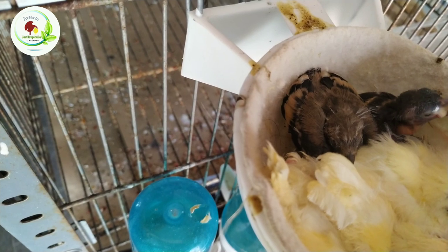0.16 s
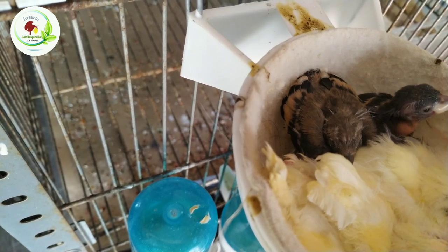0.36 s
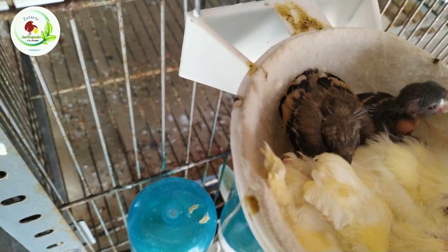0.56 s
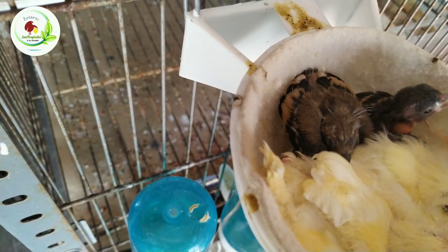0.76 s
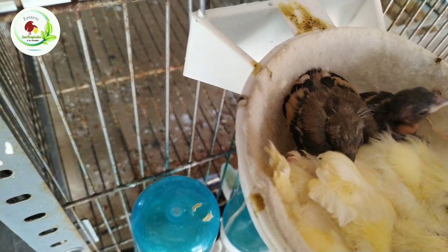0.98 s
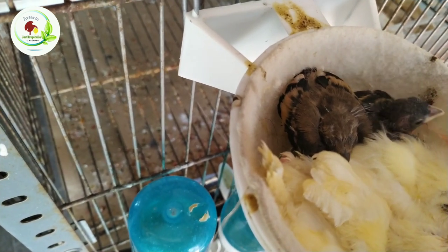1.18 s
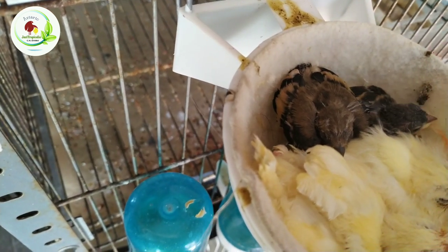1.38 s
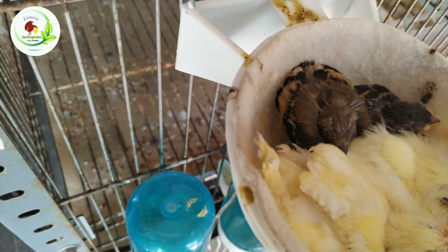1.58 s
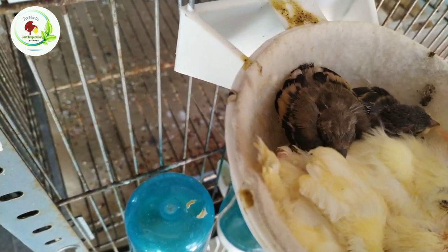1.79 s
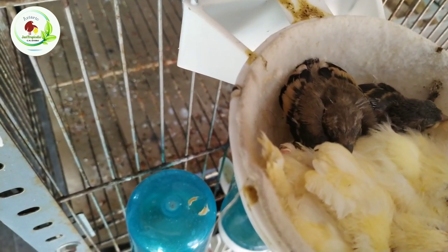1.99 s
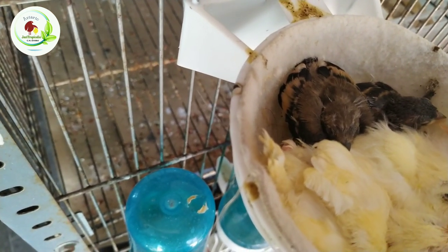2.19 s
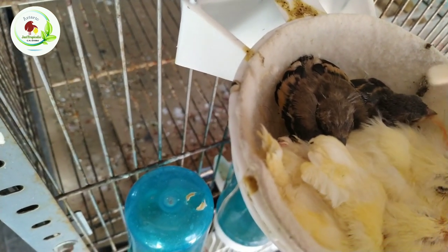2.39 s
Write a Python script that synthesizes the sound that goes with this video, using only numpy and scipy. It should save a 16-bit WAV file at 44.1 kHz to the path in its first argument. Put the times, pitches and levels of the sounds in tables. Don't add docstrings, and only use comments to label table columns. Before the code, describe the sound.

Bird whistles sweep sharply up and down in two bursts, then soft nestling hisses and beak ticks

```python
import sys
import numpy as np
from scipy import signal
from scipy.fft import rfft, irfft
from scipy.io import wavfile
from scipy.ndimage import uniform_filter1d

SR = 44100
rng = np.random.default_rng(int(sys.argv[2]) if len(sys.argv) > 2 else 0)


def generate_wav(signal):
    frames = np.transpose(np.atleast_2d(signal))
    scaled = np.clip(frames, -1, 1) * 32767
    pcm = np.round(scaled).astype(np.int16)
    wavfile.write(sys.argv[1], SR, pcm)


def natural_amplitude(level_db):
    exponent = np.asarray(level_db, float) / 20
    return 10 ** exponent


N = 108045


def evened(x):
    return x / np.sqrt(np.mean(x ** 2) + 1e-20)


def read(points, hz):
    f, value = np.transpose(points)
    return np.interp(np.log(hz + 1), np.log(f + 1), value)


def add(mix, start_s, sound):
    part = mix[..., round(max(start_s, 0) * SR):][..., :sound.shape[-1]]
    part += sound[..., :part.shape[-1]]


def edged(t, edge_s):
    return np.clip(np.minimum(t - t[0], t[-1] - t) / edge_s, 0, 1)


def coloured(count, gain):
    spectrum = rfft(rng.standard_normal(count))
    return evened(irfft(spectrum * gain(np.fft.rfftfreq(count, 1 / SR)), count))


def resonance(centre_hz, half_width_hz):
    return coloured(8192, lambda f: 1 / (1 + ((f - centre_hz) / half_width_hz) ** 2))


# f/Hz, level/dB
AIR_SPECTRUM = [(20, -1.5), (46, -1.5), (75, -13), (350, -17), (900, -25), (4000, -25), (9000, -14.5),
                (10500, -26.5), (15000, -44)]
# f/Hz, likeness/-1 to 1
AIR_LIKENESS = [(60, 0.98), (380, 0.88), (2380, -0.42), (15000, -0.061)]
AIR_DB = -33.5
HUM_HZ, HUM_DB = 127.6, -51.5


def air():
    hz = np.fft.rfftfreq(N, 1 / SR)
    left, other = rfft(rng.standard_normal((2, N)))
    same = np.clip(read(AIR_LIKENESS, hz), -1, 1)
    right = same * left + np.sqrt(1 - same ** 2) * other
    hiss = evened(irfft(np.array([left, right]) * natural_amplitude(read(AIR_SPECTRUM, hz)), N))
    hum = natural_amplitude(HUM_DB) * np.sin(2 * np.pi * HUM_HZ * np.arange(N) / SR)
    return hum + natural_amplitude(AIR_DB) * hiss


# f/Hz, t60/s
ROOM_DECAY = [(1000, 0.49), (3000, 0.6), (7000, .42), (14000, 0.45)]
EARLY_DB, EARLY_T60_S = -2.5, 0.11


def room(x):
    taps = np.zeros((2, SR // 2))
    at = np.arange(60, SR // 2 - 10, 10) + rng.integers(0, 10, (2, (SR // 2 - 61) // 10))
    np.put_along_axis(taps, at, rng.choice([-1., 1.], at.shape), 1)
    hz, t, z = signal.stft(taps, SR, nperseg=256)
    late = natural_amplitude(-60 * t / read(ROOM_DECAY, hz)[:, None])
    early = natural_amplitude(EARLY_DB - 60 * t / EARLY_T60_S)
    tail = signal.istft(z * (late + early), SR, nperseg=256)[1]
    return signal.fftconvolve(x, tail / np.linalg.norm(tail[0]), axes=1)[:, :N]


# start t/s, length t/s, level/dB
RUSTLES = [
    (1.444, 0.13, -44.5),
    (2.111, 0.14, -46.5),
]


def rustle(start, length, db):
    t = np.arange(0, length, 1 / SR)
    hiss = resonance(1500, 700)
    return start, hiss[:len(t)] * natural_amplitude(db) * edged(t, 0.0024)


# start t/s, f/Hz, t60/s, level/dB
BEAK_TICKS = [
    (1.294, 1800, 0.0048, -11),
    (2.274, 6000, 0.0052, -8.5),
    (2.8, 7400, .003, -13),
    (2.274, 9000, .003, -20),
    (2.274, 3600, .004, -25),
    (1.862, 2150, 0.0067, -21),
]


def tick(start, hz, t60, db):
    t = np.arange(600) / SR
    rise = np.minimum(t * hz / 3, 1)
    return start, natural_amplitude(db - 60 * t / t60) * rise * np.sin(2 * np.pi * hz * t)


RASP_STARTS = [.049, .56, .741, .88, .952, 1.428, 1.494, 1.665, 1.857, 2.021, 2.111, 2.15, 2.227, 2.366]
# length t/s, level/dB, wide hiss level/dB
RASPS = [(0.043, -30.5, -2), (0.12, -26, 2.5), (0.082, -19, 1.5), (0.17, -28.5, 1.5), (0.011, -19, -5.5),
         (0.082, -31, -3.5), (0.032, -24.5, -3.5), (0.037, -26.5, -8), (0.081, -35.5, -3),
         (0.013, -24, -6.5), (0.0173, -25.5, -2.5), (0.036, -26.5, -2.5), (0.037, -27.5, -5),
         (0.0095, -25, -3)]
RASP_TOP_DB = [-4.5, -30, -32, -6, -18, -8, -7, -3, -4.5, -6, -11, -5, -5, -4]
# f/Hz, level/dB
BREATH_SPECTRUM = [(600, -57), (1500, -59), (1850, -6), (2150, -0.5), (6500, 3.5), (10000, 1.5),
                   (12500, -9), (15500, -24)]
GAPE_HZ, GAPE_WIDTH_HZ = 8480, 2000
TOP_HZ, TOP_WIDTH_HZ = 11850, 7500
GRIT, SAG_DB = 0.11, -1
PUFF_DB, PUFF_S = 3, 0.0059


def rasp(start, length, db, wide_db, top_db):
    gape = resonance(GAPE_HZ, GAPE_WIDTH_HZ / 2)
    top = resonance(TOP_HZ, TOP_WIDTH_HZ / 2)
    wide = coloured(8192, lambda f: natural_amplitude(read(BREATH_SPECTRUM, f)))
    grit = 1 + GRIT * evened(uniform_filter1d(rng.standard_normal(8192), size=80))
    hiss = (gape + natural_amplitude(wide_db) * wide + natural_amplitude(top_db) * top) * grit
    t = np.arange(0, length, 1 / SR)
    level = natural_amplitude(db + SAG_DB * t / length + PUFF_DB * np.exp(-t / PUFF_S))
    return start, hiss[:len(t)] * level * edged(t, 0.00053)


# start t/s, length t/s, from f/Hz, to f/Hz
CHEEPS = [(0, .01, 7200, 7050), (0, .01, 5850, 5900), (.076, .03, 7350, 7450), (1.888, .03, 3900, 4250),
          (2.028, .03, 7800, 7650), (2.022, .035, 4950, 5450), (2.153, .035, 6900, 6750),
          (2.153, .03, 4800, 4780), (2.214, .012, 8200, 8000), (2.32, .03, 5200, 5600),
          (2.345, .05, 1830, 1920), (0, .09, 11720, 11750), (1.858, .03, 5300, 5650),
          (1.675, .09, 1040, 1050), (2.35, .05, 1050, 1040), (2.35, .06, 340, 330), (0, .04, 13000, 13050),
          (.14, .04, 10800, 10850), (1.862, .03, 4400, 3800), (1.33, .04, 11300, 11500)]
CHEEP_DB = [-33, -40.5, -31.5, -40, -31.5, -34.5, -29, -39.5, -38.5, -49.5, -52, -55, -36.5, -59.5, -59.5,
            -54, -49, -47.5, -46.5, -47.5]
CHEEP_OCTAVE_DB, CHEEP_ROUGH = -36, 0.54


def cheep(start, length, from_hz, to_hz, db):
    curve = []
    for when, glide, swell_db in [(0, 0.05, 3.5), (.25, 0.568, 14), (1, 1, 2.5)]:
        hz = from_hz + glide * (to_hz - from_hz)
        curve.append((start + when * length, hz, db + swell_db, CHEEP_OCTAVE_DB))
    return whistle((-60, -60, CHEEP_ROUGH, 0), curve)


# t/s, f/Hz, level/dB, octave level/dB over the fundamental
LONG_CALLS = [
    ((-12, -23, .3, 2), [(.15, 1980, -35.5, 1.5), (.187, 2476, -23, -15), (.196, 2576, -22, 3), (.202, 2637, -30.5, 13.5), (.212, 2790, -22, 16), (.24, 3010, -38, -20), (.262, 3242, -29, 20), (.275, 3410, -24, 18), (.29, 3450, -17, 0)]),
    ((-20, -20, .5, -0.5), [(.206, 6354, -14, -43), (.216, 5800, -26.5, 1), (.23, 4685, -16, 0.5), (.26, 3630, -16.5, -13), (.30, 2732, -20.5, -26), (.35, 2241, -27.5, 2), (.42, 1842, -36, -4), (.47, 1697, -41.5, 4)]),
    ((-30, -40, 0.37, 2), [(.288, 4534, -25, 11), (.30, 4840, -9, -13), (.345, 4967, -13, -6.5), (.362, 5296, -11.5, -6.5), (.38, 5515, -3, -18), (.41, 5770, -17, -5.5)]),
    ((-50, -60, 0.56, -0.7), [(.422, 8190, -22, -35), (.428, 6930, 3.5, -48), (.44, 7330, -18.5, -44), (.462, 7524, -4, -44)]),
              ((-14, -25, .6, 0), [(.578, 2010, -31, 3), (.592, 2099, -29, 11), (.601, 2438, -25.5, 8.5), (.64, 2456, -30.5, 5.5), (.66, 2480, -43, 22)]),
    ((-39, -56, .6, -2), [(.735, 7700, -10, -28), (.75, 7550, -14.5, -46), (.765, 6600, -17.5, -38), (.81, 5450, -19.5, -21), (.835, 5170, -27, -27)]),
    ((-24, -20, .4, -2), [(.745, 2115, -52, -8), (.86, 2081, -31, -3), (.95, 2057, -29.5, -32), (1.0, 2155, -22, -6.5)]),
              ((-20, -30, .7, 1.5), [(.86, 2350, -26.5, 0.5), (.90, 2515, -23.5, -20), (.94, 2330, -33, -33), (.97, 2450, -24, -30), (.995, 2506, -35, -20)]),
    ((-14.5, -13.5, .2, 1.5), [(.99, 2480, -24, -1), (1.0, 2547, -20.5, -4.5), (1.025, 2700, -30, -3), (1.045, 3263, -19, -18), (1.095, 4334, -20.5, 2), (1.112, 5080, -15, -9.5), (1.13, 5290, -5.5, -9.5), (1.15, 5730, -6.5, -46)]),
    ((-14, -27, .12, 0), [(1.033, 3104, -40, -1), (1.05, 3401, -29.5, 24), (1.08, 3568, -22, -13), (1.11, 3607, -25.5, 21.5), (1.16, 3535, -32.5, -1)]),
    ((-48, -68, 0.63, -2), [(1.2, 7870, -12, -39), (1.206, 6805, 1, -32), (1.213, 6900, -11.5, -11.5), (1.232, 7850, -16.5, -61)]),
    ((0, 0, 1.1, -0.2), [(1.859, 1690, -38.5, 7.5), (1.872, 1844, -55.5, 24), (1.915, 1873, -65, 26.5)]),
]
WOBBLE, WOBBLE_TOP_HZ = .035, 5000
EDGE_S = 0.0009


def whistle(voice, curve):
    third_db, fourth_db, rough, pan_db = voice
    s, hz, db, octave_db = np.transpose(curve)
    t = np.arange(s[0], max(s[-1], s[0] + .004), 1 / SR)
    drift = signal.oaconvolve(rng.standard_normal((N // 4, 2)), np.hanning(110)[:, None], "same")
    wobble, flutter = drift[:len(t)].T / 6.4
    pitch = uniform_filter1d(np.interp(t, s, hz), size=200, mode="nearest")
    pitch = pitch + np.minimum(pitch, WOBBLE_TOP_HZ) * WOBBLE * rough * wobble
    phase = 2 * np.pi * np.cumsum(pitch) / SR
    octave = np.interp(t, s, octave_db)
    tone = np.zeros(len(t))
    for k, partial_db in enumerate([0, octave, octave + third_db, octave + fourth_db], start=1):
        audible = pitch * k < 17000
        tone += natural_amplitude(partial_db) * audible * np.sin(k * phase)
    level = np.sqrt(2) * natural_amplitude(np.interp(t, s, db)) * (1 + rough * flutter)
    pan = natural_amplitude(np.array([[.5], [-.5]]) * pan_db)
    return s[0], tone * level * edged(t, EDGE_S) * pan


DIRECT_DB, TICK_ROOM_DB = -6, -5.5


def scene():
    birds, ticks = np.zeros((2, 2, N))
    for call in LONG_CALLS:
        add(birds, *whistle(*call))
    for row, db in zip(CHEEPS, CHEEP_DB):
        add(birds, *cheep(*row, db))
    for start, row, top_db in zip(RASP_STARTS, RASPS, RASP_TOP_DB):
        add(birds, *rasp(start, *row, top_db))
    for row in RUSTLES:
        add(birds, *rustle(*row))
    for row in BEAK_TICKS:
        add(ticks, *tick(*row))
    direct = np.array([birds[0], np.roll(birds[1], 1)])
    return natural_amplitude(DIRECT_DB) * direct + ticks + room(birds + natural_amplitude(TICK_ROOM_DB) * ticks) + air()


# f/Hz, level/dB under the loudest
MASK_DEPTH = [(2400, 29), (3000, 25), (4300, 25), (5000, 27), (10000, 25), (12000, 22), (15000, 22)]
MASK_FROM_HZ, MASK_DB_PER_BAND, MASK_CHANCE_DB = 2400, .15, 6
STARVED_FROM_HZ, STARVED_TO_HZ, STARVED_SIGMA = 2700, 4600, 1.4


def masked(x):
    hz, t, z = signal.stft(x, SR, nperseg=2048)
    band = np.arange(128)
    band_hz = hz[:1024:8]
    power = (abs(z[:, :1024]) ** 2).reshape(2, 128, 8, -1).mean((0, 2))
    db = 10 * np.log10(power + 1e-14)
    high = (band_hz > MASK_FROM_HZ)[:, None]
    slope = MASK_DB_PER_BAND * abs(band[:, None] - band)[..., None]
    spread = (np.where(high, db, -99)[None] - slope).max(1)
    chance = evened(uniform_filter1d(rng.standard_normal(db.shape), size=3, axis=1))
    middle = ((band_hz > STARVED_FROM_HZ) & (band_hz < STARVED_TO_HZ))[:, None]
    starved = middle & (chance > STARVED_SIGMA) & (db < spread - MASK_CHANCE_DB * 2)
    heard = db > spread - read(MASK_DEPTH, band_hz)[:, None] + MASK_CHANCE_DB * chance
    keep = np.repeat(~high | (heard & ~starved), 8, axis=0)
    keep = np.vstack([keep, keep[-1:]])
    return signal.istft(z * keep, SR, nperseg=2048)[1][:, :N]


def low_pass(x):
    return signal.sosfilt(signal.butter(12, 15640, fs=SR, output="sos"), x)


DRIVE_DB, EDGE_HZ = -0.97, 14450


def record(dry):
    dull = signal.oaconvolve(dry, signal.firwin(255, EDGE_HZ, fs=SR)[None], "same")
    mix = np.clip(masked(dull) * natural_amplitude(DRIVE_DB), -1, 1)
    return low_pass(mix)


dry = scene()
out = record(dry)
generate_wav(out)
```